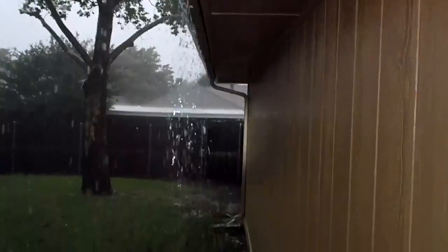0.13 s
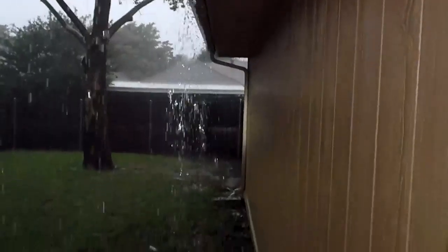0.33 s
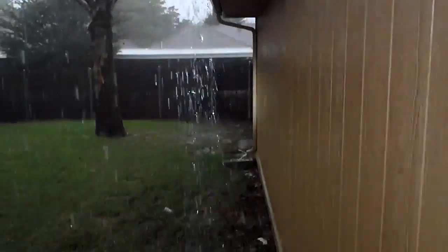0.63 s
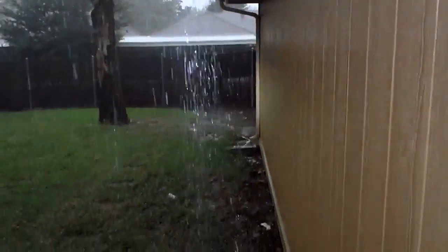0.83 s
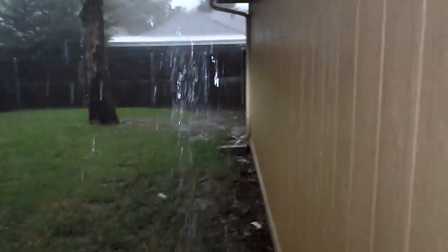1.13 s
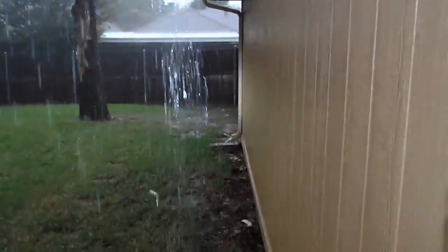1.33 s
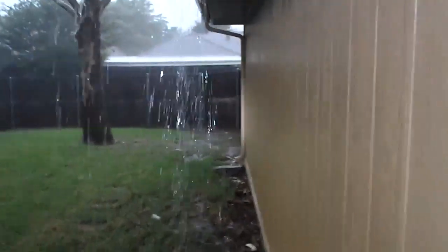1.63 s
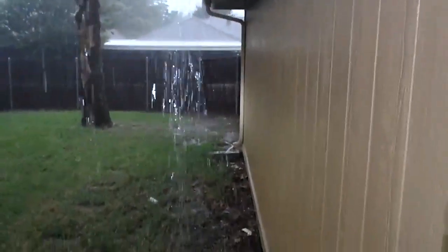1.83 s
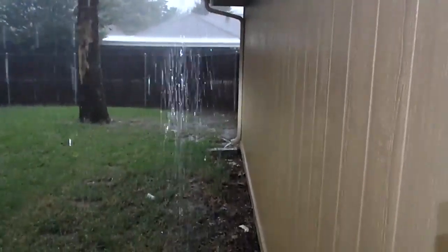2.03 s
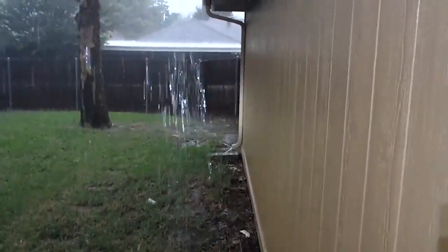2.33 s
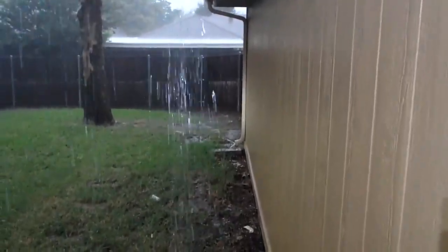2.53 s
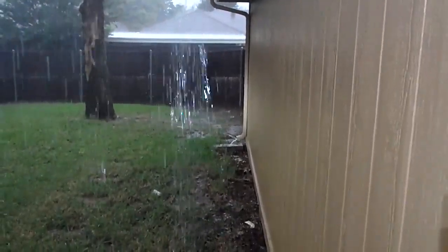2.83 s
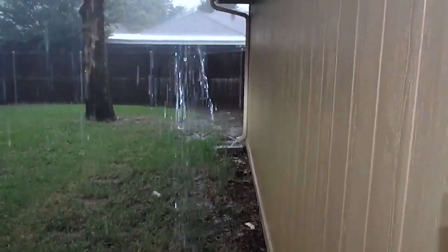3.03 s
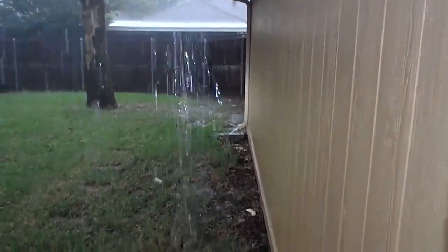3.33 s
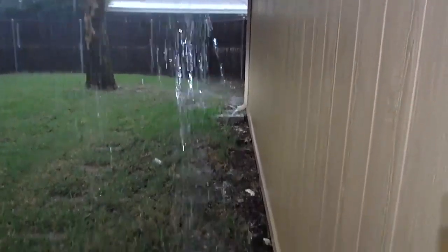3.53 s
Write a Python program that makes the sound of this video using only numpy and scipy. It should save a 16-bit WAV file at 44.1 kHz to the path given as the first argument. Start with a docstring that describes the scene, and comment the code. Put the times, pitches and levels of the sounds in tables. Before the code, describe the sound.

Heavy rain throughout: steady bright hiss under dense crackling drops, with gutter water slapping grass and mud many times a second in hard, rattling splats, tightly echoed by a nearby wall. A soft low rumble fades after 1.5 s. Wind thuds the small microphone around 1.0-1.9, 2.5-2.9 and strongly at 3.4 s, briefly ducking the rain. Tiny bubble plops come near 3.0 and 3.6 s.

```python
"""Beside a house wall in heavy rain: a hiss of far rain lies under a crackle of near drops and spray.
A sheet of water from an overflowing gutter slaps onto grass and mud as clicks with rattling spray,
and the wall repeats each near impact a few milliseconds later; a few trapped bubbles ring.
Wind lumps and knocks buffet a small microphone with a bright resonance; a low noise rumble fades behind.
A gain control pulls everything down when the total is loud, as when the wind pushes hard."""
import sys
import numpy as np
from scipy import signal
from scipy.fft import rfft, irfft
from scipy.io import wavfile
from scipy.ndimage import uniform_filter1d

SR = 44100
rng = np.random.default_rng(int(sys.argv[2]) if len(sys.argv) > 2 else 0)


def digitize_waveform(pressure):
    """Quantize a signal to 16-bit integers and store it at the path in sys.argv[1].

    Rows of a 2-D input are taken as channels; values are limited to [-1, 1].
    """
    field = np.atleast_2d(pressure).T
    bounded = np.clip(field, -1, 1)
    quanta = np.round(bounded * 32767).astype(np.int16)
    wavfile.write(sys.argv[1], SR, quanta)


def attenuation_scalar(level_db):
    """Turn a level in dB into a linear amplitude multiplier (20 dB per decade)."""
    decades = np.asarray(level_db, float) / 20
    return 10 ** decades


N = 162729  # length in samples

SPRAY_T60_S = 0.19  # how long spray takes to die by 60 dB
WALL_NEAR_S, WALL_FAR_S, WALL_DB = 0.0024, 0.0034, -2  # echo delays and level against the impact


def evened(x):
    """Scales to rms 1."""
    return x / np.sqrt(np.mean(x ** 2) + 1e-20)


def curve(rows):
    """A control joined by straight lines in time."""
    s, value = np.transpose(rows)
    return np.interp(np.arange(N) / SR, s, value)


def read(points, hz):
    """A spectrum joined by straight lines in log frequency."""
    f, value = np.transpose(points)
    return np.interp(np.log(hz + 1), np.log(f + 1), value)


def add(mix, s, sound):
    """Mixes a sound in at time s."""
    part = mix[max(round(s * SR), 0):][:len(sound)]
    part += sound[:len(part)]


def coloured(x, points):
    """Minimum-phase filter with the given spectrum: nothing rings before a click."""
    hz = abs(np.fft.fftfreq(4096, 1 / SR))
    log_gain = np.log(attenuation_scalar(np.maximum(read(points, hz), -100)))
    phase = -signal.hilbert(log_gain).imag
    taps = np.fft.ifft(np.exp(log_gain + 1j * phase)).real[:2048]
    return signal.oaconvolve(x, taps / np.linalg.norm(taps))[:len(x)]


def noise(points):
    """Steady noise with the given spectrum, rms 1."""
    spectrum = rfft(rng.standard_normal(N))
    return evened(irfft(spectrum * attenuation_scalar(read(points, np.fft.rfftfreq(N, 1 / SR))), N))


def clicks(per_s, spread_db, size):
    """Random impacts of either sign; a few are large."""
    when, how, sign = rng.random((size, 3)).T
    height_db = spread_db * np.minimum(-np.log(how + 1e-9), 3.0)
    return (when < per_s / SR) * attenuation_scalar(height_db) * np.sign(sign - 0.5)


def grain(hz, cycles):
    """One drop impact: a few dying cycles, energy 1."""
    cycles = max(cycles, 0.3)
    turns = np.arange(0, 6 * cycles, hz / SR)
    g = np.sin(2 * np.pi * turns) * np.exp(-turns / cycles)
    return g / np.linalg.norm(g)


def wall_lag(size):
    """Delay in samples of the wall echo, drawn at random for where the water lands, mostly far."""
    nearer = rng.random(size) ** 2
    return (SR * (WALL_FAR_S - (WALL_FAR_S - WALL_NEAR_S) * nearer)).astype(int)


def grains(train, count=16):
    """Gives each impact one of several pitches and its echo off the wall."""
    kind = rng.integers(0, count, len(train))
    at = np.arange(len(train))
    sorted_train = np.zeros((count, len(train) + SR // 10))
    np.add.at(sorted_train, (kind, at), train)
    np.add.at(sorted_train, (kind, at + wall_lag(len(train))), attenuation_scalar(WALL_DB) * train)
    out = 0
    for k, hz in enumerate(np.geomspace(880, 12740, count)):
        drop = grain(hz, cycles=1.26) * np.sqrt(hz)
        out = out + signal.oaconvolve(sorted_train[k], drop)[:len(train)]
    return out


# how hard the water comes down, for the far rain and the near water: start_s, level_db
POUR_LEVEL = [(0.0, -21), (0.88, -21), (1.08, -25), (1.35, -21), (1.5, -24), (1.64, -27), (1.92, -24),
              (2.15, -19.5), (2.5, -25), (2.85, -22.5), (3.12, -22.5), (3.47, -23), (3.69, -21)]
# relative colour of the far rain hiss: pitch_hz, level_db (per Hz)
FAR_RAIN_COLOUR = [(88, -54), (150, -9.5), (251, -13), (748, -18.5), (1160, -13), (1800, -13),
                   (3520, -12.5), (5360, 1.5), (6130, -2), (10100, -25.5), (11500, -21.5), (13700, -25.5),
                   (14500, -57)]


def wash():
    """Far rain on lawn, trees and roofs: countless impacts blur into hiss with drifting patches."""
    offset_db, patch_db, follow = -2, 2.5, 0.6  # follow: share of the pour's swings that is heard
    _, _, z = signal.stft(noise(FAR_RAIN_COLOUR), SR, nperseg=512)
    patches = uniform_filter1d(rng.standard_normal(z.shape), 8, 0)  # smooth over frequency
    patches = evened(uniform_filter1d(patches, 10, 1))  # then over time
    hiss = signal.istft(z * attenuation_scalar(patch_db * patches), SR, nperseg=512)[1][:N]
    pour_db = curve(POUR_LEVEL)
    usual_db = pour_db.mean()
    return attenuation_scalar(offset_db + usual_db + follow * (pour_db - usual_db)) * evened(hiss)


# relative colour of drops and slaps at the microphone, resonance included: pitch_hz, level_db (per Hz)
NEAR_WATER_COLOUR = [(150, -38), (250, -17), (729, -17.5), (1020, -22.5), (1320, -16.5), (1820, -16),
                     (3540, -9), (5320, 1), (6100, -2), (9480, -19.5), (11400, -23), (13100, -32),
                     (14500, -35.5)]


def near_water():
    """Single drops, and blobs from the gutter that each burst into a short cluster of spray."""
    drops_db, drops_per_s, drop_spread_db = -4.5, 1500, 3  # levels ride on the pour
    splash_db, splashes_per_s, splash_spread_db = -5, 110, 1.3
    splash_s, spray_per_s, spray_spread_db = 0.0048, 1500, 4.0
    t = np.arange(0, 0.08, 1 / SR)
    swell = np.exp(-(t / splash_s - 2) ** 2)
    tail = 0.45 * attenuation_scalar(-60 * abs(t - 2 * splash_s) / SPRAY_T60_S)
    landings = abs(clicks(splashes_per_s, splash_spread_db, size=N))
    blobs = signal.oaconvolve(landings, swell + tail)[:N]
    drop_hits = clicks(drops_per_s, drop_spread_db, size=N)
    spray_hits = blobs * clicks(spray_per_s, spray_spread_db, size=N)
    drops = evened(coloured(grains(drop_hits), NEAR_WATER_COLOUR))
    spray = evened(coloured(grains(spray_hits), NEAR_WATER_COLOUR))
    return attenuation_scalar(curve(POUR_LEVEL)) * (attenuation_scalar(drops_db) * drops + attenuation_scalar(splash_db) * spray)


# wind lumps on the microphone: start_s, level_db
WIND_LEVEL = [(0.0, -32), (0.9, -32), (1.45, -21.5), (2.2, -26), (2.6, -20), (3.1, -23), (3.45, -20),
              (3.69, -25)]
# relative colour of the wind lumps: pitch_hz, level_db (per Hz)
WIND_LUMP_COLOUR = [(1.5, -60), (4, -0.5), (12, -1.5), (25, -2.5), (51, -12), (86, -30), (150, -38),
                    (400, -54), (800, -100)]
# single pushes and knocks of wind: centre_s, level_db (of the push before its pull), width_s
WIND_KNOCKS = [(0.601, -21, 0.00075), (1.025, -10.5, .012), (1.08, -12.5, 0.0026), (1.18, -7, 0.0022),
               (1.21, -9.5, 0.0014), (1.447, -9, 0.02), (1.546, -9, 0.013), (1.559, -20, 0.00063),
               (1.724, -9, 0.017), (1.866, -11, 0.0078), (2.509, -11, 0.0055), (2.779, -21, 0.002),
               (2.891, -10.5, 0.016), (3.389, -5.5, 0.012)]


def wind():
    """Slow pressure lumps, sharper on the push than on the pull, plus a few knocks."""
    steadiness, skew = 0.5, 0.098
    lumps = noise(WIND_LUMP_COLOUR)
    swing = np.sqrt(abs(uniform_filter1d(lumps ** 2, 5000)) + 0.02)
    lumps = evened(lumps / swing ** steadiness)  # partly evens out strong and weak gusts
    out = attenuation_scalar(curve(WIND_LEVEL)) * evened(lumps + skew * (lumps ** 2 - 1))
    for s, level_db, width in WIND_KNOCKS:
        u = np.arange(-4, 7, 1 / (width * SR))  # time in widths
        push = np.exp(-u ** 2)
        pull = np.exp(-((u - 2) / 2) ** 2) / 2
        add(out, s - 4 * width, attenuation_scalar(level_db) * (push - pull))
    return out


# low rumble, perhaps far thunder: start_s, level_db
RUMBLE_LEVEL = [(0.0, -29.5), (1.3, -31.5), (2.0, -38.5), (2.6, -34), (3.69, -39)]
# relative colour of the rumble: pitch_hz, level_db (per Hz)
RUMBLE_TONE = [(26, -48), (45, -43), (59, -29), (74, 3.5), (97, 2), (145, -2.5), (215, -13), (442, -17.5),
               (700, -23), (910, -68)]


def rumble():
    """Low noise roll whose level swells in random lumps."""
    lumps_db = 2 * noise([(2, -5.5), (8, 8.0), (25, -16), (60, -60)])
    return attenuation_scalar(curve(RUMBLE_LEVEL)) * evened(attenuation_scalar(lumps_db) * noise(RUMBLE_TONE))


# loudest slaps of the falling sheet: click_s, peak_db (above -6.5 dB full scale),
# low_db (tilt at 900 Hz), high_db (tilt at 9500 Hz, before a common 13 dB lift)
SHEET_SLAPS = [(0.0942, 0, -14, -67), (0.114, 0.5, -14, -43), (0.16, -4, -25, -5), (0.192, 1, -23, -29),
               (0.2798, 2.5, -37, -13), (0.3625, 4, -12, -36), (0.4212, 5, -9, -27), (0.456, 2, -19, -17),
               (0.4996, -1, -23, -36), (0.603, -2, -36, -32), (0.7347, 0.5, -10, -31),
               (0.8595, 2, -14, -29), (0.9652, -0.5, -13, -30), (1.0177, 0.5, -11, -22),
               (1.09, -5, -35, -30), (1.1056, -3, -7, -30), (1.3164, 3, -4, -32), (1.3583, -2, -26, -13),
               (1.3856, 0.5, -8, -24), (1.4194, -2, -13, -27), (1.4671, -0.5, -26, -12),
               (1.7136, -2.5, -29, -13), (1.748, -4.5, -18, -15), (1.8172, 0, -18, -20),
               (1.8911, 0.5, -14, -21), (1.957, 3, -17, -20), (2.0147, 0, -18, -15), (2.15, -0.5, -24, -17),
               (2.2436, 2, -30, -19), (2.2797, -5, -30, -32), (2.376, 0, -36, -14), (2.389, 1.5, -32, -14),
               (2.4482, -7, -30, -31), (2.57, 2, -13, -17), (2.6848, 1, -20, -19), (2.7905, -4, -20, -22),
               (2.839, 2.5, -18, -22), (2.875, -1.5, -17, -36), (2.8887, 0, -13, -27),
               (2.993, -0.5, -7, -22), (3.0498, 2.5, -17, -11), (3.1782, -2, -40, -21),
               (3.3224, -2, -4, -28), (3.4488, -5, -35, -12), (3.5299, 2, -22, -16), (3.66, 3, -57, -29),
               (3.6868, 5, -38, -27)]


def slap(s, peak_db, low_db, high_db):
    """A big blob lands: spray swells into a hard click and rattles off, deeper or brighter by blob."""
    lead = 200  # samples of spray before the click
    smack_s = 0.0003  # the blob takes about this long to flatten
    rise_s, fall_s = 0.004, 0.0083
    t = (np.arange(1800) - lead) / SR
    swell = np.exp(-((t - 0.002) / np.where(t < 0.002, rise_s, fall_s)) ** 2)
    tail = 0.29 * (t > 0) * attenuation_scalar(-60 * abs(t) / SPRAY_T60_S)
    impact = 0.17 * clicks(2500, 3.14, size=len(t)) * (swell + tail)
    smack = slice(lead, lead + 30)
    impact[smack] += rng.standard_normal(30) * np.exp(-t[smack] / smack_s)
    impact = impact + attenuation_scalar(WALL_DB) * np.roll(impact, wall_lag(1)[0])
    tilt = [(900, low_db), (2500, low_db + 16.5), (4500, 0), (7000, 0), (9500, high_db + 13)]
    sound = coloured(impact, [(f, db + read(tilt, f)) for f, db in NEAR_WATER_COLOUR])
    return s - lead / SR, attenuation_scalar(peak_db - 6.5) * sound / abs(sound).max()


# blobs that trap air in the puddle and ring:
# start_s, level_db, pitch_hz (at the start), t60_s, roughness (0-1), climb_per_s (1/s)
BUBBLE_PLOPS = [(0.657, -28.5, 363, 2.3, .6, 18), (2.989, -20, 1690, 0.17, 0.95, 0.091),
                (3.556, -9.5, 3400, 0.008, 0, 1.7), (3.68, -18, 1350, 0.015, 0.04, 1.5)]


def plop(s, level_db, hz, t60, rough, climb):
    """A trapped bubble rings unevenly, its pitch climbing ever faster; a quick climb ends in a burst."""
    t = np.arange(4000) / SR
    flutter = evened(uniform_filter1d(rng.standard_normal(len(t)), 55))
    attack = np.minimum(t / 0.00068, 1)
    burst = 8 * (1.15 - climb * t)  # silence once the climb reaches 1.15
    ending = np.clip(np.minimum(burst, (t[-1] - t) / 0.01), 0, 1)
    turns = np.cumsum(hz * np.exp((climb * t) ** 2)) / SR
    ring = (1 - rough + rough * flutter) * np.sin(2 * np.pi * turns)
    return s, attenuation_scalar(level_db - 60 * t / t60) * attack * ending * ring


def scene():
    """All sources at one microphone; the rain and near water surge a few times a second."""
    surge_db = 1.34 * noise([(1, -65), (3, 3.0), (10, 5), (25, -13), (60, -70)])
    mix = attenuation_scalar(surge_db) * (wash() + near_water()) + wind() + rumble()
    for row in SHEET_SLAPS:
        add(mix, *slap(*row))
    for row in BUBBLE_PLOPS:
        add(mix, *plop(*row))
    return mix[None]


def band_limit(x):
    """A steep low-pass at the top of the band."""
    return signal.sosfilt(signal.butter(12, 14760, fs=SR, output="sos"), x)


def record(dry):
    """Gain control drops fast and recovers slowly; peaks beyond 0.88 clip; then the treble is cut off."""
    knee_db, squeeze = -17, 0.21  # squeeze: dB of gain lost per dB over the knee
    reading_fall_db_per_s = 5.5  # how fast the held level reading sinks
    power_db = 10 * np.log10(abs(uniform_filter1d(dry[0] ** 2, 1300)) + 1e-12)
    fall = np.arange(N) * reading_fall_db_per_s / SR
    held_db = np.maximum.accumulate(power_db + fall) - fall
    over_db = np.maximum(held_db - knee_db, 0)
    ducked = dry / attenuation_scalar(squeeze * uniform_filter1d(over_db, 400))
    low_pass = signal.firwin(255, 14450, fs=SR)[None]  # cutoff in Hz
    mix = signal.oaconvolve(np.clip(ducked, -0.88, 0.88), low_pass, "same")
    return band_limit(mix)


dry = scene()
out = record(dry)
digitize_waveform(out)
```